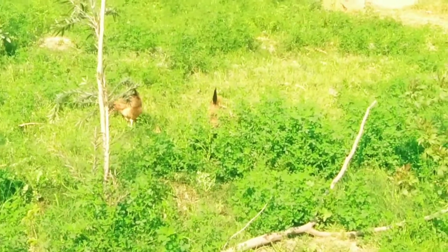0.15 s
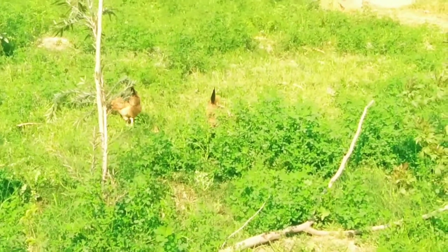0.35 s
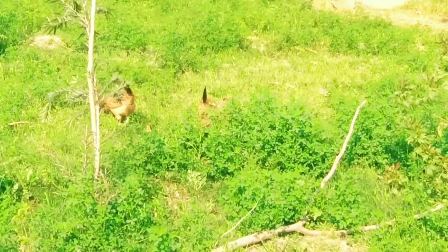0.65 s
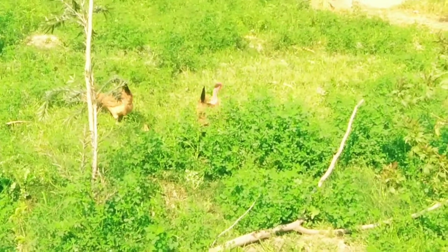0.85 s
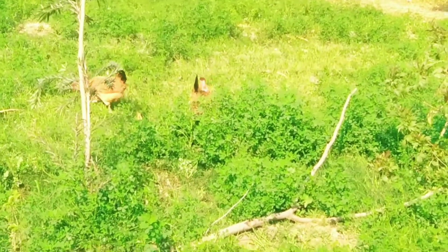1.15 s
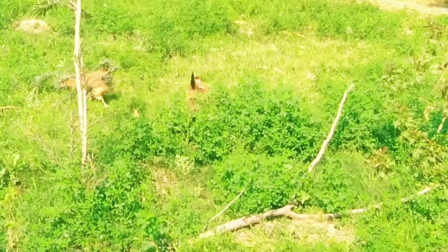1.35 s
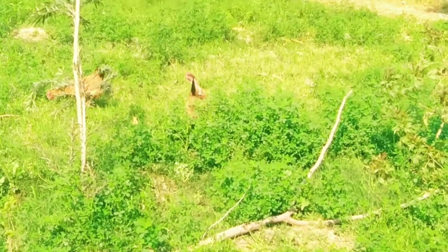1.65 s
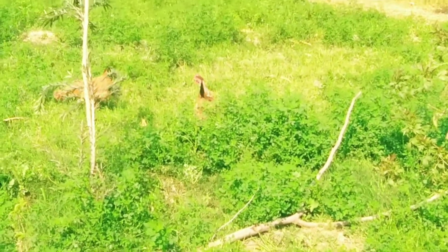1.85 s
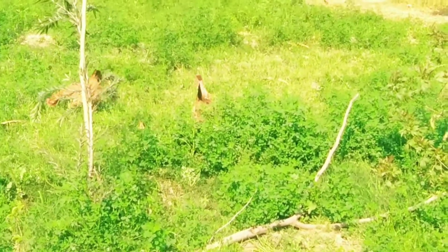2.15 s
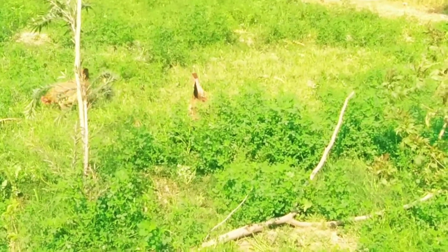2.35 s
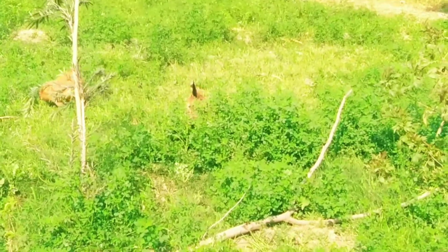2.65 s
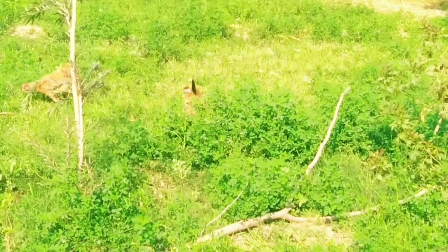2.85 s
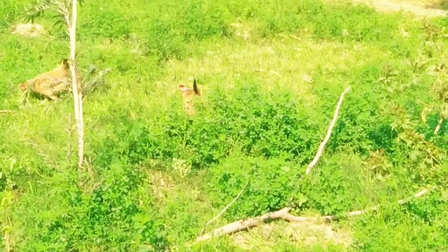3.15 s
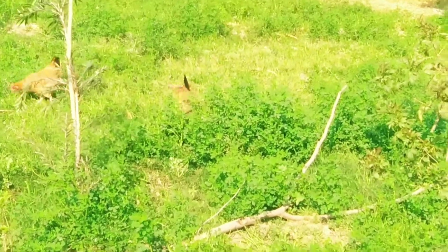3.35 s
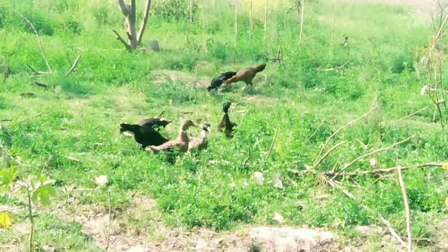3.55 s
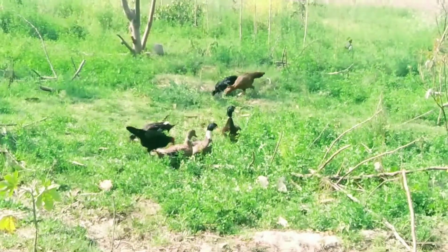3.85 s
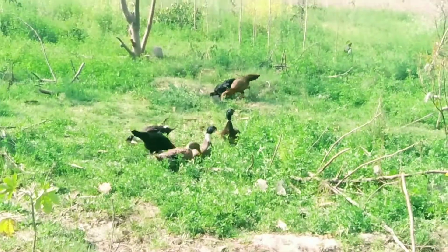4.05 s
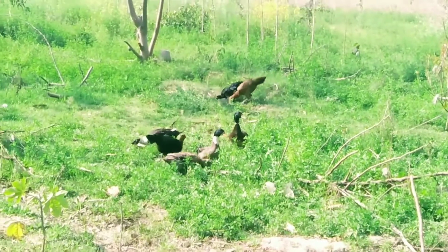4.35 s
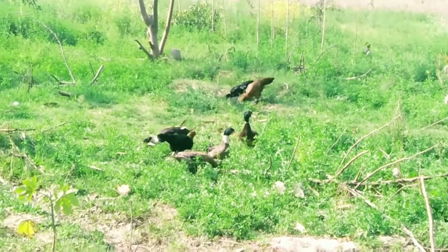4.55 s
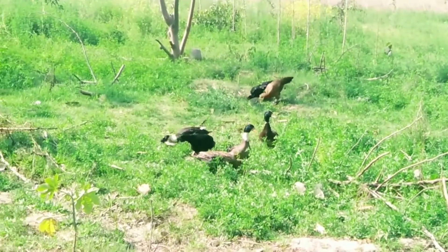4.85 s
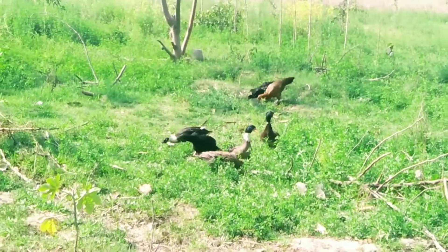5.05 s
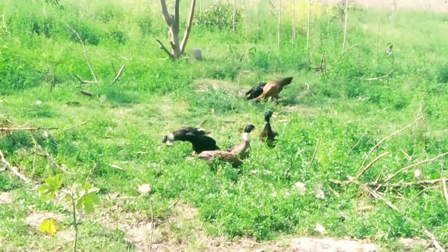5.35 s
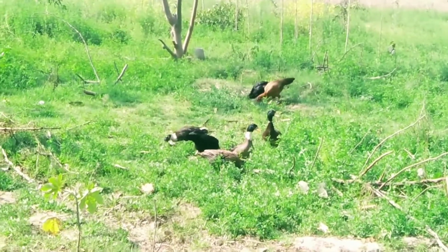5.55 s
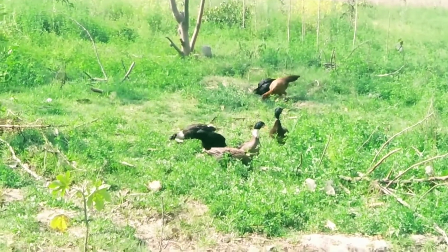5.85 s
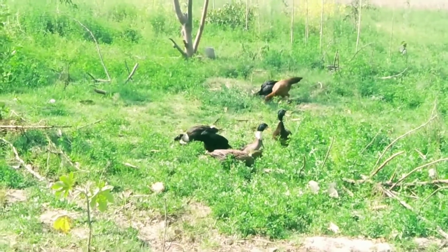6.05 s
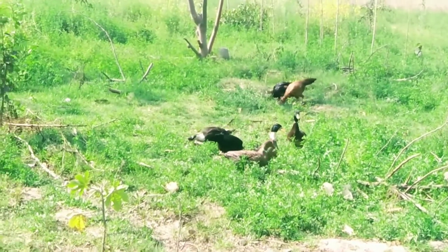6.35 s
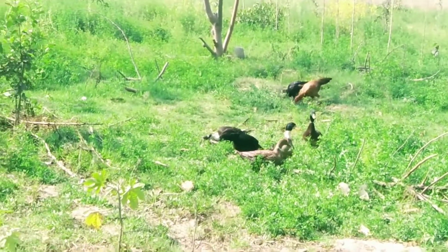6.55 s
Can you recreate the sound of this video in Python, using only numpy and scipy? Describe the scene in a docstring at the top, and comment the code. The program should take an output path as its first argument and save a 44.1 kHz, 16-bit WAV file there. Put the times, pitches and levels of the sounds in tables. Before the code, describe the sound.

A chicken rasps, honks and squeals in gusty microphone wind; after a brief silence, a duck quacks over hissing grass and peeping chicks.

```python
"""Free-range poultry in a weedy field. Wind buffets the microphone while a fowl rasps, honks, rasps twice,
squeals and rasps once more into a grumble; chicks peep and stalks snap. After a short silence, at a
second spot, a duck quacks in two runs over hissing grass, peeps, soft clucks and a far rooster.
Rasps, honk and quacks are syrinx pulses and chopped air through moving throat resonances; squeal and
peeps are fluttering tones; gusts are trains of eddies; grass and stalks are coloured noise."""
import sys
import numpy as np
from scipy import signal
from scipy.fft import rfft, irfft, next_fast_len
from scipy.io import wavfile
from scipy.ndimage import uniform_filter1d, map_coordinates

SR = 44100
rng = np.random.default_rng(int(sys.argv[2]) if len(sys.argv) > 2 else 0)


def wrap_up_sound(samples):
    """Save the sound to the file named by the first command line argument, as 16-bit audio."""
    columns = np.atleast_2d(samples).T
    # keep every value between -1 and 1, then stretch to whole-number steps
    tamed = np.clip(columns, -1, 1)
    steps = np.round(tamed * 32767).astype(np.int16)
    wavfile.write(sys.argv[1], SR, steps)


N = 296352

# grass hiss at the first and second spot (time [s], level [dB])
LULL_LEVEL = [(0, -69), (1.4, -65), (2.2, -54.5), (3.1, -62.5)]
GRASS_LEVEL = [(3.8, -66), (3.93, -56.5), (4.1, -50), (5.45, -49), (5.7, -46.5), (6.72, -46.5)]
# noise spectra (frequency [Hz], gain [dB])
LULL_SPECTRUM = [(300, -4), (700, 2), (1000, -21), (2000, -1.5), (3200, -14.5), (6000, -14), (9000, -7),
                 (11500, -15), (15000, -17.5)]
GRASS_SPECTRUM = [(88, -14), (150, -3.5), (296, -4.5), (339, -7), (509, -6), (985, -10.5), (1700, -6.5),
                  (3220, -12.5), (5030, -8), (6600, -13.5), (7710, -8.5), (8490, -13.5), (9540, -31.5),
                  (11100, -51), (15500, -46)]
RUMBLE_SPECTRUM = [(20, -32), (40, -10), (70, -4.5), (105, -3.5), (170, -13.5), (280, -20), (600, -58)]
STALK_SPECTRUM = [(800, -36.5), (2500, 1), (4000, -5), (7500, 8), (10000, -8.5), (15000, -28.5)]
BREATH_SPECTRUM = [(500, -33.5), (1000, 4.5), (2000, -2), (3200, -4.5), (4200, 1.5), (5500, -9.5),
                   (7800, -0.5), (10500, -21.5), (15000, -23.5)]
FADING_CALL_SPECTRUM = [(150, -41), (250, -8), (758, -11), (830, -4), (978, -23.5), (1400, -13.5),
                        (2300, -17.5), (3500, -38.5), (9000, -47), (11700, -83), (19800, -120)]
# gusts (strongest eddy [s], level [dB], build-up [s], decay [s])
GUSTS = [(0.039, -39.5, 0.047, 0.171), (0.214, -35.5, 0.053, .06), (0.543, -27.5, 0.0105, 0.0282),
         (1.045, -31.5, 0.065, 0.055), (1.163, -8, 0.0301, 0.0555), (1.265, -18, 0.088, 0.0437),
         (1.423, -22.5, 0.087, 0.0816), (1.565, -17, 0.0387, 0.032), (1.598, -10, 0.0248, 0.0244),
         (1.641, -21.5, 0.0218, 0.023), (2.077, -9.5, 0.0355, 0.042), (2.167, -35, 0.0157, 0.0286),
         (2.475, -12, 0.0176, 0.0611), (2.624, -22, 0.01, 0.049), (2.667, -17.5, 0.039, 0.0413),
         (2.706, -15, 0.0094, 0.026), (2.885, -20.5, 0.0354, 0.035), (3.02, -33, 0.149, 0.139),
         (5.19, -33.5, 0.0655, 0.137)]
# breaking stalks (time [s], peak [dB], t60 [s])
SNAPS = [(0.271, -32.5, 0.045), (0.294, -39, 0.078), (2.234, -28.5, 0.048), (4.587, -24, 0.0142),
         (4.81, -30.5, 0.013), (5.0643, -30, 0.0142), (5.206, -34.5, 0.024)]
# brushed weeds, air in scratchy peeps, thin tweets (start [s], length [s], level [dB])
RUSTLES = [(.21, 0.109, -52), (1.466, 0.0364, -55), (2.24, 0.16, -47), (2.8, 0.324, -63.5)]
SCRATCHES = [(1.21, 0.1405, -52), (1.52, 0.142, -49.5)]
TWEETS = [(4.263, 0.013, -49.5), (4.382, 0.095, -48.5), (4.516, .018, -46.5)]
# throat resonances (centre [Hz], width [Hz], gain [dB])
FAR_THROAT = [(507, 182, 11.5), (880, 280, -8.5), (1784, 305, -4.5), (2620, 490, -12.5), (3340, 320, -10),
              (4130, 290, -16), (4490, 840, -5)]
PIPING_THROAT = [(1680, 670, -13.5), (2853, 480, 3), (3700, 370, 2), (4400, 520, -11), (5260, 450, -9.5)]
SCRATCH_THROAT = [(2257, 250, -0.5), (3220, 190, -3), (3860, 250, 2.5), (6145, 653, -3), (7900, 530, -15),
                  (9320, 820, -14)]
DUCK_THROAT = [(258.8, 98, -4), (551.8, 137.4, -5.5), (785.5, 312, -10), (1108.4, 110, -4.5),
               (1401, 222, -2.5), (1792, 172.7, 2), (2150, 414, -8.5), (4066, 355, -18.5), (5083, 400, -19),
               (7950, 666, -24.5)]
HONK_THROAT = [(537, 316, 3.5), (1079.2, 540, 4.5), (1607, 580, 3), (2290, 280, 3), (2790, 1200, -19.5),
               (3320, 460, -19.5), (3800, 430, -23.5), (4520, 240, -19), (5480, 380, -13.5),
               (6194, 410, -10.5), (7400, 900, -18), (9200, 780, -19.5), (12145, 3000, -50.5)]
RASP_THROAT = [(1164.7, 150, -7), (1521.6, 240, 1), (1920, 190, 4.5), (2164, 170.05, -2), (4380, 300, -4),
               (5847, 400, -12.5), (6920, 370, -13.5), (8000, 400, -12.5), (9100, 530, -15.5),
               (12570, 3000, -41.5)]
# gliding calls (start [s], length [s], level [dB], first [Hz], middle [Hz], last [Hz], roughness [0-1])
FAR_CALLS = [(5.423, .11, -45, 428.9, 471.6, 631.3, 0.19), (5.65, .21, -50, 847.2, 868.3, 842, 0),
             (6.0, .07, -49, 554, 531.8, 482.1, 0), (6.198, .05, -47.5, 566.3, 526.5, 476, 0)]
WHINE = [(6.322, 0.054, -38, 1546, 1490, 1509, 0.38)]
PIPING = [(5.514, .07, -51, 746.5, 887, 905.4, 0), (5.589, 0.068, -50, 938, 1030, 980, 0.12),
          (5.976, .135, -43.5, 1317, 1780, 1233, 0), (6.326, 0.1, -45.5, 1499, 1498, 1414, 0.37)]
SECOND_VOICE = [(1.962, .2, -29.5, 2414, 2553, 2401, .55), (2.326, .085, -40, 2305, 2265, 2181, .05)]
GRUMBLE = [(2.505, 0.26, -40, 1524, 1337, 1228, .55)]
# chicks (start [s], length [s], level [dB], top [Hz], last [Hz], rise [share], roughness [-])
PEEPS = [(1.227, 0.0683, -53.5, 3900, 3515, 0.15, 0.66), (1.289, 0.049, -56, 3200, 3142, 0.096, 0.43),
         (1.367, 0.0322, -56.5, 3740, 3324, .05, 0.24), (1.496, 0.0386, -52, 3880, 3780, 0.044, 0.11),
         (1.548, 0.0752, -50, 3900, 2133, 0.0735, 0.75), (3.867, 0.046, -55, 4760, 2386, 0.0585, 0.19),
         (4.147, 0.0694, -46.5, 3152, 2235, 0.0546, 1.24), (4.813, .093, -46, 3239, 2007, 0.558, 0.47),
         (5.026, 0.071, -50, 3235, 3153, 0.2455, 0.1), (5.092, .04, -41, 2998, 1994, 0.019, 0.13),
         (6.429, 0.0485, -47, 3500, 2830, 0.059, 0.53), (6.478, 0.076, -44, 3021, 2780, 0.294, 0.43)]
# upward pips (start [s], level [dB])
PIPS = [(3.835, -56), (4.083, -51), (4.361, -47.5)]
# falling clucks (start [s], level [dB], first pitch [Hz])
CLUCKS = [(2.765, -42, 1437), (2.921, -44, 1505), (4.289, -44, 1867), (5.418, -54, 1407),
          (6.201, -48.5, 1398)]
# duck (start [s], length [s], level [dB], first [Hz], last [Hz], roughness [0-1],
# throat tuning [ratio], treble [dB])
QUACKS = [(3.884, 0.08, -44.5, 290.6, 230.6, 0.3, 1.042, 1),
          (4.144, .056, -35.5, 335.1, 221.9, 0.08, 0.976, 2),
          (4.406, .054, -31, 378.5, 212.6, 0.01, 1.011, -4.5),
          (4.65, .056, -33, 365.5, 212.9, 0.08, 0.986, -4),
          (4.89, .055, -32.5, 385.2, 205.6, 0.07, 0.986, 0),
          (6.084, 0.058, -41.5, 406, 232.8, 0.06, 0.866, -17),
          (6.3, .064, -38.5, 375.2, 227.2, 0.06, 0.856, 6),
          (6.509, 0.054, -36, 317, 214.1, 0.07, 0.971, 8.5),
          (6.703, 0.047, -44.5, 374.4, 233.4, 0.26, 1.18, 1)]
# honk contour (time [s], pitch [Hz], level [dB], roughness [0-1])
HONK_CONTOUR = [(.53, 389.4, -50, 0.58), (.546, 413.2, -41, 0.52), (.555, 432.2, -26, 0.31),
                (.575, 502.1, -27, 0.21), (.598, 545.4, -20, 0.05), (.615, 565.4, -24.5, 0.01),
                (.632, 555.4, -27.5, 0.14), (.645, 540.4, -42, 0.1), (.655, 535, -65, 0.01)]
# opening bill (time [s], throat tuning [ratio])
HONK_TUNING = [(.53, 0.828), (.595, 0.922), (.655, 1)]
# squeal effort (time [s], level [dB])
SQUEAL_EFFORT = [(1.9, -38.5), (1.91, -33), (1.98, -34.5), (2.09, -28.5), (2.118, -24), (2.14, -30.5),
                 (2.172, -23), (2.25, -40.5)]
# upper-register notes of the squeal (start [s], length [s], first [Hz], last [Hz])
BREAKS = [(1.877, 0.0846, 1448, 1580), (2.017, 0.0367, 1718, 1522), (2.072, 0.0345, 1723, 1560),
          (2.107, 0.0195, 1757, 1495), (2.157, 0.039, 1591, 1523)]
# fowl (start [s], end [s], level [dB], top pitch [Hz], throat tuning [ratio], treble [dB],
# roughness [0-1])
RASPS = [(0.287, 0.57, -38.5, 306.1, 1.0066, -6.5, 0.41), (0.908, 1.197, -38.5, 304.9, 1.005, -8, 0.54),
         (1.667, 2.01, -30.5, 280.3, 0.9587, -1, 0.5), (2.296, 2.6, -30, 282.3, 0.9836, -2, 0.66)]
# echo decay (frequency [Hz], t60 [s])
YARD_T60 = [(200, 1), (550, .3), (1700, 0.4304), (3000, 0.37), (5000, 0.318), (12000, 0.338)]
# suppressor threshold (frequency [Hz], level [dB]) and its shift (time [s], offset [dB])
THRESHOLD = [(150, -100), (400, -82), (1200, -91.5), (3200, -92), (5200, -93), (8000, -95.5), (11000, -115)]
THRESHOLD_SHIFT = [(3.8, -3), (4.1, -41)]
# output gain, near silent between the spots (time [s], gain [dB])
DROPOUT = [(3.1, -6), (3.114, -63), (3.66, -64), (3.73, -17), (3.8, -8)]

SECOND_SPOT_S = DROPOUT[1][0]


def amp(db):
    """Decibels to gain."""
    return 10 ** (np.asarray(db) / 20)


def unit(x):
    """Scale to rms 1."""
    return x / np.sqrt(np.mean(x ** 2) + 1e-20)


def along(points, hz):
    """Read (Hz, value) points on a log axis."""
    f, v = np.transpose(points)
    return np.interp(np.log(hz + 1), np.log(f + 1), v)


def level(rows):
    """Gain per sample from (s, dB) rows."""
    return amp(np.interp(np.arange(N) / SR, *np.transpose(rows)))


def wobble(rate_hz, size):
    """Smooth random curve."""
    knots = rng.standard_normal(int(size * rate_hz / SR) + 4)
    return map_coordinates(knots, [np.arange(size) * rate_hz / SR], mode="nearest")


def colour(x, points, ratio=1, treble_db=0):
    """Minimum-phase filter of (Hz, dB) shape, shifted by ratio, with a treble shelf."""
    m = 2 * next_fast_len(len(x) // 2 + 4096)
    hz = np.fft.rfftfreq(m, 1 / SR)
    db = along(points, hz / ratio) + treble_db * along([(1900, 0.094), (2900, 0.898)], hz)
    cepstrum = irfft(np.log(amp(db)))
    cepstrum[1:m // 2] *= 2
    cepstrum[m // 2 + 1:] = 0
    return irfft(rfft(x, m) * np.exp(rfft(cepstrum)))[:len(x)]


def noise(points, size):
    """Coloured noise, rms 1."""
    return unit(colour(rng.standard_normal(size), points))


def add(track, start_s, x):
    """Mix x into the track."""
    part = track[max(round(start_s * SR), 0):][:len(x)]
    part += x[:len(part)]


def arch(u, edge):
    """Swell over u = 0..1; a small edge squares it."""
    return np.abs(np.sin(np.pi * u)) ** edge


def controls(rows):
    """Per-sample columns of a call over its own span."""
    s, *cols = np.transpose(rows)
    return [np.interp(np.arange(s[0], s[-1], 1 / SR), s, c) for c in cols]


def glide(start_s, length_s, db, first_hz, middle_hz, last_hz, rough):
    """Rows (time [s], pitch [Hz], level [dB], roughness) of a swelling call through three pitches."""
    u = np.linspace(0, 1, 100)
    onset_hz = (first_hz - middle_hz) * (1 - 2 * u)
    ending_hz = (last_hz - middle_hz) * (2 * u - 1) ** 2
    hz = middle_hz + np.where(u < .5, onset_hz, ending_hz)
    swell_db = db - 18.5 * (1 - arch(u, edge=0.13))
    return np.column_stack([start_s + length_s * u, hz, swell_db, np.full_like(u, rough)])


def trilled(rows, depth, rate_hz=61.63):
    """Shake a call's pitch; depth is a share of it."""
    s, hz, db, rough = np.transpose(rows)
    return np.column_stack([s, hz * (1 + depth * np.sin(2 * np.pi * rate_hz * (s - s[0]))), db, rough])


def resonances(modes):
    """(Hz, dB) shape of steep-sided resonances."""
    hz = np.geomspace(20, SR / 2, 1200)
    gain = sum(amp(db) / (1 + ((hz * hz - centre * centre) / (hz * width)) ** 2)
               for centre, width, db in modes)
    return np.column_stack([hz, 20 * np.log10(gain + 1e-4)])


def moving_throat(source, modes, ratio, treble_db=0, count=5):
    """Resonances follow the tuning ratio by cross-fading static throats."""
    stops = np.linspace(ratio.min(), ratio.max() + 1e-6, count)
    return sum(np.interp(ratio, stops, share) * colour(source, resonances(modes), stop, treble_db)
               for stop, share in zip(stops, np.eye(count)))


def syrinx(hz, rough, jitter, shimmer_db):
    """One pulse per membrane closure, plus air chopped at the same rate."""
    size, rate_hz = len(hz), np.mean(hz)
    cycles = np.cumsum(hz * (1 + jitter * wobble(rate_hz, size))) / SR
    offset = (cycles % 1 - .5) * SR / hz
    pulses = np.sinc(offset) * np.exp(-(offset / 6) ** 2) * amp(shimmer_db * wobble(rate_hz, size))
    air = rng.standard_normal(size) * np.sin(np.pi * cycles) ** 4
    share = np.clip(rough, 0, 1)
    return np.sqrt(1 - share) * unit(pulses - pulses.mean()) + np.sqrt(share) * unit(air)


def voiced(rows, throat, jitter):
    """Syrinx through a static throat."""
    out = np.zeros(N)
    hz, db, rough = controls(rows)
    source = syrinx(hz, rough, jitter, shimmer_db=1.89)
    add(out, rows[0][0], amp(db) * unit(colour(source, resonances(throat))))
    return out


def whistle(rows, flutter_hz, depth, overtone_db=0, partials=3):
    """Tone whose pitch and level flutter with roughness; overtone_db is per octave."""
    out = np.zeros(N)
    hz, db, rough = controls(rows)
    phase = 2 * np.pi * np.cumsum(hz * (1 + depth * rough * wobble(flutter_hz, len(hz)))) / SR
    tone = sum(amp(overtone_db * np.log2(k)) * np.sin(k * phase) for k in range(1, partials + 1))
    flutter = amp(5.3 * rough * wobble(flutter_hz, len(hz)))
    add(out, rows[0][0], amp(db) * unit(tone * flutter))
    return out


def swishes(rows, spectrum, flicker_hz=69.65, flicker_db=3):
    """Short, uneven swells of noise."""
    out = np.zeros(N)
    for start_s, length_s, db in rows:
        u = np.linspace(0, 1, int(length_s * SR))
        swell = amp(db + flicker_db * wobble(flicker_hz, len(u))) * arch(u, edge=0.93)
        add(out, start_s, swell * noise(spectrum, len(u)))
    return out


def grass():
    """Faint hiss at the first spot, fuller at the second."""
    lull = level(LULL_LEVEL) * noise(LULL_SPECTRUM, N) * amp(1.3 * wobble(15, N))
    hiss = level(GRASS_LEVEL) * noise(GRASS_SPECTRUM, N) * amp(1.85 * wobble(19, N))
    return np.where(np.arange(N) / SR > SECOND_SPOT_S, hiss, lull)


def eddy(db):
    """One shove of the diaphragm; strong eddies are quicker and break into finer ones."""
    t = np.arange(-SR // 25, SR // 25) / SR
    hz = 98.2 + 228.6 * amp(db)
    churn = (0.512 + 1.8 * amp(db)) * wobble(3 * hz, len(t))
    return amp(db) * np.sin(2 * np.pi * (hz * t + rng.random()) + churn) / np.cosh(t * hz / 0.4123)


def wind(gap_s=.019, fall_db=19.5, wake_db=-29, wake_s=0.088):
    """Each gust is a train of eddies that builds and decays; its wake swells a steady rumble."""
    t, out = np.arange(N) / SR, np.zeros(N)
    rumble = amp(np.where(t < SECOND_SPOT_S, -52, -60.5))
    steps = np.arange(-8, 9)
    for peak_s, db, build_s, decay_s in GUSTS:
        late, stray = rng.standard_normal((2, len(steps))) * (steps != 0)
        offsets_s = gap_s * (steps + 0.15164 * late)
        drops_db = fall_db * np.abs(np.maximum(-offsets_s / build_s, offsets_s / decay_s)) ** 1.3
        for offset_s, eddy_db in zip(offsets_s, db - drops_db + 1.5 * stray):
            shove = eddy(eddy_db)
            add(out, peak_s + offset_s - len(shove) / SR / 2, shove)
        wake = amp(db + wake_db) * np.exp(-np.abs(t - peak_s) / wake_s) * (t > peak_s)
        rumble = np.hypot(rumble, wake)
    out += rumble * amp(3.3 * wobble(14, N)) * noise(RUMBLE_SPECTRUM, N)
    return colour(out, [(20, -23.5), (55, 8.0), (450, 2.5), (900, -20), (2000, -52.5)])


def stalks():
    """Weeds rustle and dry stalks snap under the birds' feet."""
    out, t = swishes(RUSTLES, STALK_SPECTRUM), np.arange(SR // 10) / SR
    for start_s, db, t60_s in SNAPS:
        snap = colour(rng.standard_normal(len(t)) * amp(-60 * t / t60_s), STALK_SPECTRUM)
        add(out, start_s, amp(db) * snap / np.abs(snap).max())
    return out


def yard(x, build_s=0.029):
    """Scattered echoes off trees and walls; decay varies with frequency."""
    hz, t, bands = signal.stft(rng.standard_normal(SR // 2), SR, nperseg=256)
    decay = amp(-60 * t / along(YARD_T60, hz)[:, None])
    tail = signal.istft(bands * decay * (1 - np.exp(-t / build_s)), SR, nperseg=256)[1]
    return signal.fftconvolve(x, tail / np.linalg.norm(tail))[:N]


def far_fowl():
    """Distant fowl and a rooster, then a held note behind the quacks."""
    calls = sum(voiced(glide(*call), FAR_THROAT, jitter=0.0035) for call in FAR_CALLS)
    whine = sum(whistle(glide(*call), flutter_hz=295.6, depth=0.096, overtone_db=-2) for call in WHINE)
    return calls + whine


def piping():
    """Reedy, lightly trilled calls."""
    return sum(voiced(trilled(glide(*call), depth=.024), PIPING_THROAT, jitter=0.0064) for call in PIPING)


def chicks(pip_s=0.026, pip_hz=(2693, 3470, 4280), tweet_hz=(4960, 5050, 4700)):
    """Arched peeps, trilled when rough, two with rushing air; upward pips and high tweets."""
    out, u = swishes(SCRATCHES, resonances(SCRATCH_THROAT)), np.linspace(0, 1, 100)
    for start_s, length_s, db, top_hz, last_hz, rise, rough in PEEPS:
        before = np.clip(1 - u / rise, 0, 1)
        after = np.clip((u - rise) / (1 - rise), 0, 1)
        hz = top_hz * (1 - 0.13 * before ** 1.7) - (top_hz - last_hz) * after ** 2.5
        swell_db = db - 16 * (1 - arch(u, edge=0.022))
        rows = np.column_stack([start_s + length_s * u, hz, swell_db, np.full_like(u, rough)])
        out += whistle(trilled(rows, depth=.1 * rough), flutter_hz=679, depth=0.064, partials=1)
    pips = [glide(start_s, pip_s, db, *pip_hz, rough=0.18) for start_s, db in PIPS]
    tweets = [glide(*row, *tweet_hz, rough=0.119) for row in TWEETS]
    return out + sum(whistle(rows, flutter_hz=702, depth=0.141, partials=1) for rows in pips + tweets)


def clucks(length_s=0.0263, fall=0.2835):
    """Soft, short tones of falling pitch."""
    out = np.zeros(N)
    for start_s, db, hz in CLUCKS:
        rows = glide(start_s, length_s, db, hz, hz * (1 - fall / 2), hz * (1 - fall), rough=0.243)
        out += whistle(rows, flutter_hz=423, depth=0.235, overtone_db=-18.5)
    return out


def duck(shut_tuning=0.696, opening_share=0.432):
    """Each quack is a run of slowing pulses; the opening bill lifts the resonances."""
    out = np.zeros(N)
    for start_s, length_s, db, first_hz, last_hz, rough, tuning, treble_db in QUACKS:
        u = np.linspace(0, 1, int(length_s * SR))
        hz = last_hz + (first_hz - last_hz) * (1 - u) ** 1.4
        source = syrinx(hz, rough, jitter=0.045, shimmer_db=2.0)
        bill = shut_tuning + (1 - shut_tuning) * np.clip(u / opening_share, 0, 1)
        quack = unit(moving_throat(source, DUCK_THROAT, tuning * bill, treble_db))
        add(out, start_s, amp(db + 3.7548) * arch(u ** 1.194, edge=0.369) * quack)
    return out


def honk():
    """Loud rising call; the throat tunes upward as the bill opens."""
    out, start_s = np.zeros(N), HONK_CONTOUR[0][0]
    hz, db, rough = controls(HONK_CONTOUR)
    tuning = np.interp(start_s + np.arange(len(hz)) / SR, *np.transpose(HONK_TUNING))
    source = syrinx(hz, rough, jitter=.013, shimmer_db=2.79)
    add(out, start_s, amp(db) * unit(moving_throat(source, HONK_THROAT, tuning)))
    return out


def squeal(low_hz=1225.8, flip_s=0.0065, clears_at_s=2.11, clearing_s=.015):
    """A hoarse voice flips register and clears, with a higher voice and spitting air; then a grumble."""
    effort_db, = controls(SQUEAL_EFFORT)
    t = SQUEAL_EFFORT[0][0] + np.arange(len(effort_db)) / SR
    in_break, notes = np.zeros(len(t)), []
    for start_s, length_s, first_hz, last_hz in BREAKS:
        in_break += (t > start_s) & (t < start_s + length_s)
        notes += [(start_s, first_hz), (start_s + length_s, last_hz)]
    upper = uniform_filter1d(in_break, int(flip_s * SR))  # 0 = low register, 1 = high
    hz = low_hz + (np.interp(t, *np.transpose(notes)) - low_hz) * upper
    rough = 0.15 + 0.35 * (1 - np.tanh((t - clears_at_s) / clearing_s)) / 2
    voice_db = effort_db + 2.3 + 3 * upper - 9 * rough
    out = whistle(np.column_stack([t, hz, voice_db, rough]), flutter_hz=588.2, depth=0.2, overtone_db=-19)
    out += sum(whistle(glide(*call), flutter_hz=377, depth=.12, overtone_db=-27) for call in SECOND_VOICE)
    out += sum(whistle(glide(*call), flutter_hz=452, depth=0.1693, overtone_db=-18) for call in GRUMBLE)
    spit_db = 0.3553 * effort_db - 34 + 8 * upper + 9.9 * rough + 1.4 * wobble(160, len(t))
    spit = amp(spit_db) * noise(BREATH_SPECTRUM, len(t))
    add(out, t[0], spit * arch(np.linspace(0, 1, len(t)), edge=0.28))
    return out


def fading_call(db=-37.5, fall_db_per_s=111):
    """Noisy end of a call, dying away at the start."""
    return amp(db - fall_db_per_s * np.arange(N) / SR) * noise(FADING_CALL_SPECTRUM, N)


def rasps(sag=.11, drone_sag=.55):
    """Hoarse, uneven pulses over a drone; pitch, throat and drone arch with the effort."""
    out = np.zeros(N)
    for start_s, end_s, db, top_hz, tuning, treble_db, rough in RASPS:
        u = np.linspace(0, 1, int((end_s - start_s) * SR))
        slack = 1 - arch(u ** .85, edge=.5)
        bend = 1 - sag * slack
        source = syrinx(top_hz * bend, rough, jitter=.048, shimmer_db=2.5)
        call = unit(moving_throat(source, RASP_THROAT, tuning * bend, treble_db))
        air = amp(-12.5 + 1.5 * treble_db) * noise(BREATH_SPECTRUM, len(u))
        add(out, start_s, amp(db) * arch(u, edge=1.098) * (call + air))
        t = start_s + (end_s - start_s) * u
        drone_hz = 3 * top_hz * (1 - drone_sag * slack ** 1.3)
        drone_db = db - 16 - 22 * (1 - arch(u ** 1.417, edge=0.18))
        drone = np.column_stack([t, drone_hz, drone_db, np.full_like(u, rough)])
        out += whistle(drone, flutter_hz=406.9, depth=0.1183, partials=1)
    return out


def scene():
    """Birds, each with its own echo send, plus stalks, wind and grass."""
    sends_db = [(honk(), -6), (rasps() + fading_call(), -7.5), (squeal(), -12), (duck(), -16),
                (chicks() + clucks() + piping(), -7.5), (far_fowl(), -11)]
    birds = sum(bird for bird, _ in sends_db)
    echoes = yard(sum(amp(db) * bird for bird, db in sends_db))
    return (birds + echoes + stalks() + wind() + grass())[None]


def suppress(x, floor_db=-16):
    """Noise suppressor: turns down bands under the threshold."""
    hz, t, bands = signal.stft(x, SR, nperseg=1024)
    power = uniform_filter1d(np.abs(bands) ** 2, size=5, axis=-2)
    power = np.abs(uniform_filter1d(power, size=5, axis=-1))
    threshold = amp(along(THRESHOLD, hz)[:, None] + np.interp(t, *np.transpose(THRESHOLD_SHIFT)))
    gain = np.maximum(power / (power + threshold ** 2), amp(floor_db))
    return signal.istft(bands * gain, SR, nperseg=1024)[1][:, :N]


def record(dry):
    """Noise suppression, dropout between the spots, band limit."""
    m, top_hz = next_fast_len(N + SR // 2), 15650
    passband = np.fft.rfftfreq(m, 1 / SR) < top_hz
    return irfft(rfft(suppress(dry) * level(DROPOUT), m) * passband, m)[:, :N]


dry = scene()
out = record(dry)
wrap_up_sound(out)
```